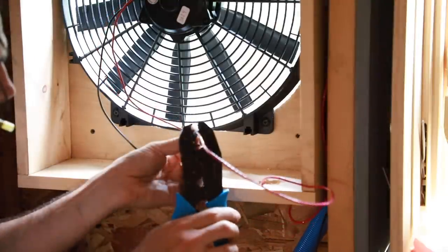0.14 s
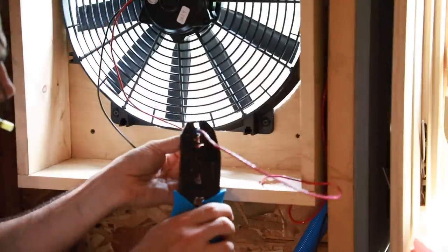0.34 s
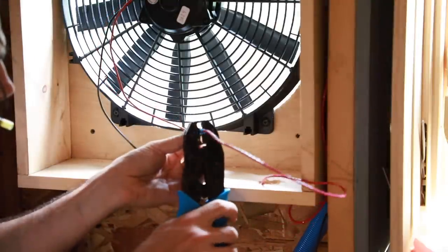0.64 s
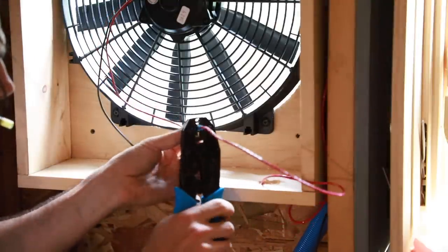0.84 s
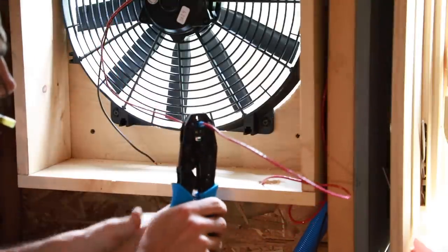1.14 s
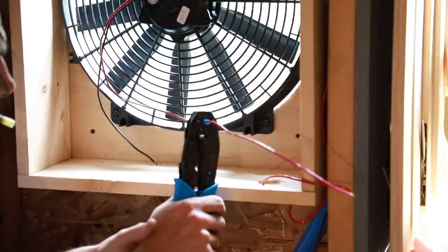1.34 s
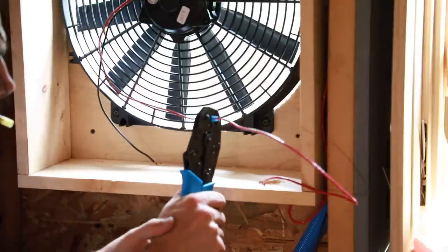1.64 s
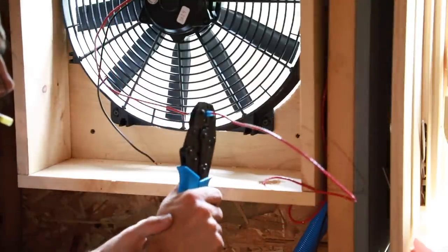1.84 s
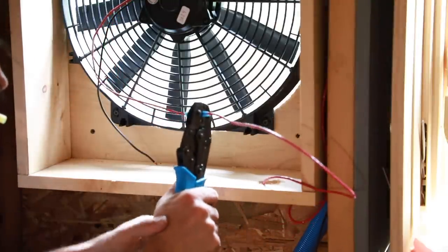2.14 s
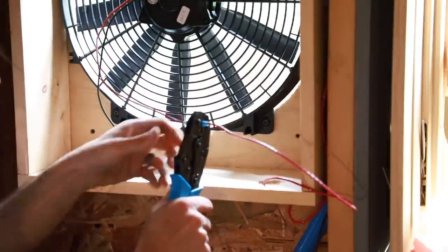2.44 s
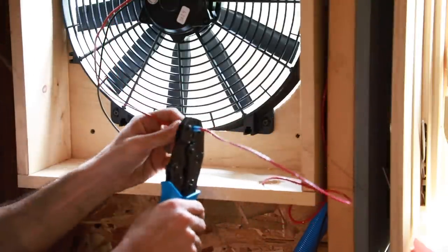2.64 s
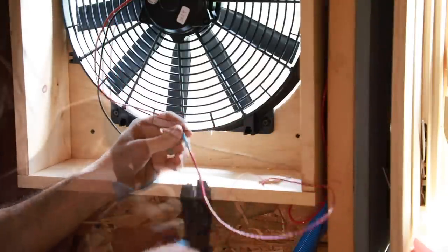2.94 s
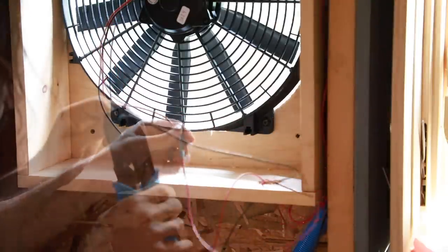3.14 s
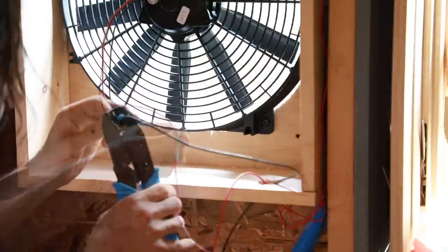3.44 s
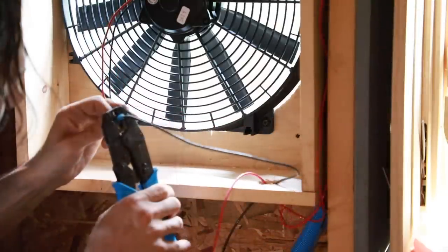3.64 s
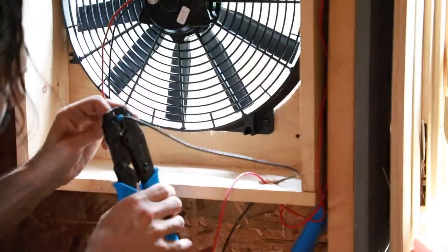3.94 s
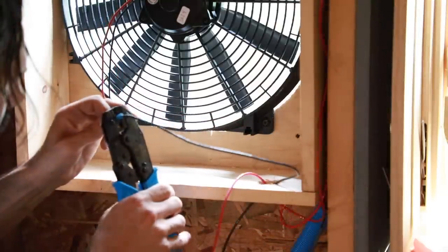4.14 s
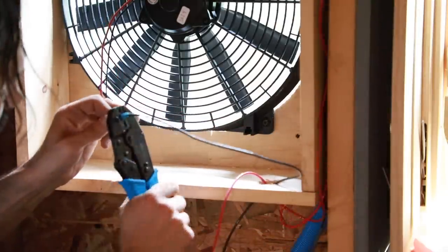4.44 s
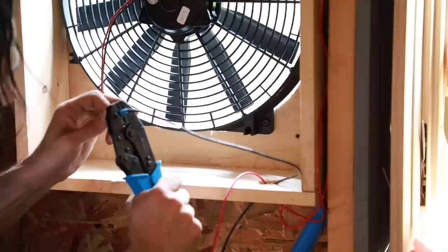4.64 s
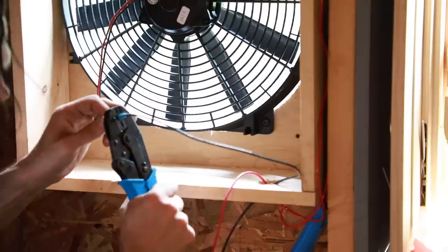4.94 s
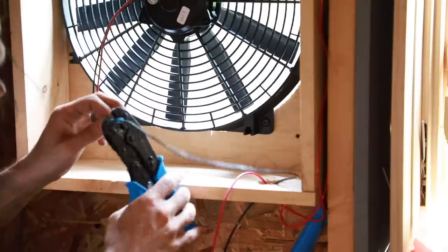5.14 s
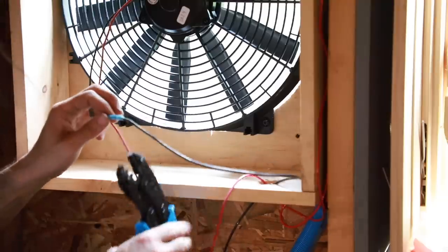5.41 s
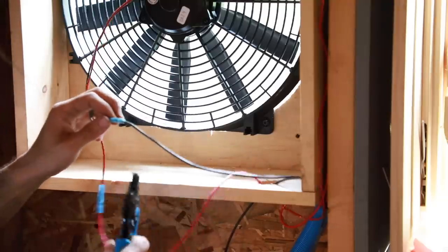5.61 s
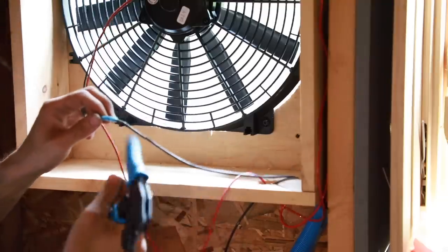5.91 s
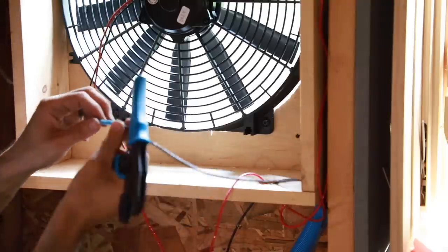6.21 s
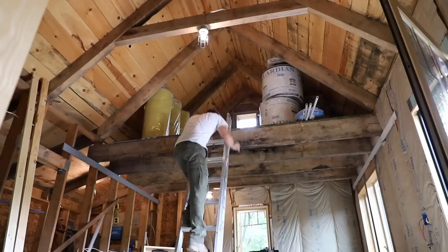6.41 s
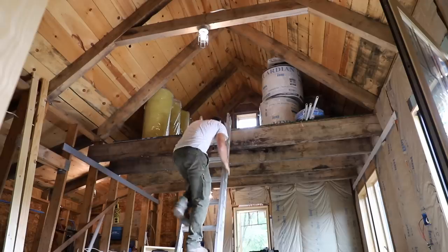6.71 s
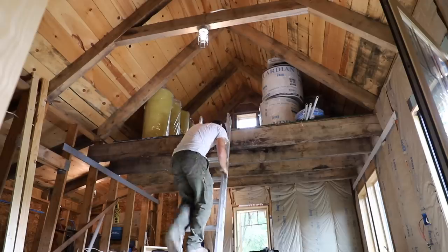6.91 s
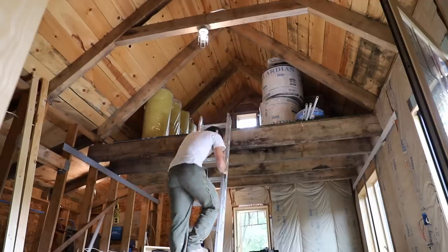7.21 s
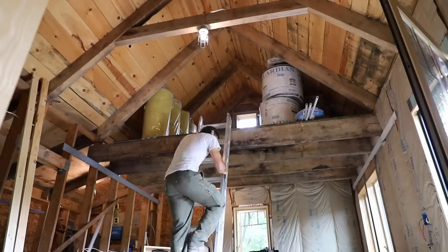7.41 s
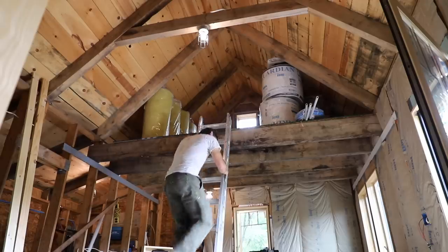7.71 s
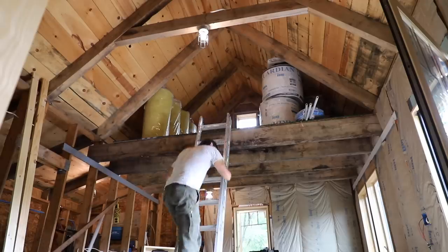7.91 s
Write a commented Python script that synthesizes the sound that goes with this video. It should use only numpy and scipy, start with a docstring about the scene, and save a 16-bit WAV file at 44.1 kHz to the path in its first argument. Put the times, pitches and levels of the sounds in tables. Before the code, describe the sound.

Loud metallic ratchet clicks and small wooden knocks up close, followed by more distant ladder footsteps, booming floor and a brief squeak.

```python
"""Ratchet crimper and ladder in a timber workshop

Close to the microphone a steel crimper clicks tooth by tooth, rasps open and knocks a wooden frame: cracks of
coloured noise with damped modes. Then, from farther away, someone steps down an aluminium ladder: thumps, noise
through rail resonances, swaying beams and a stick-slip squeak. Outdoors are hum, insect noise and two crickets."""
import sys
import numpy as np
from scipy import signal
from scipy.fft import rfft, irfft, next_fast_len
from scipy.io import wavfile
from scipy.ndimage import uniform_filter1d, map_coordinates

SR = 44100
rng = np.random.default_rng(int(sys.argv[2]) if len(sys.argv) > 2 else 0)


def digitize_waveform(pressure):
    """Quantize a signal to 16-bit integers and store it at the path in sys.argv[1].

    Rows of a 2-D input are taken as channels; values are limited to [-1, 1].
    """
    field = np.atleast_2d(pressure).T
    bounded = np.clip(field, -1, 1)
    quanta = np.round(bounded * 32767).astype(np.int16)
    wavfile.write(sys.argv[1], SR, quanta)


def field_ratio(decibels):
    """Amplitude ratio for a level in dB (20 dB per decade); scalars and array-likes work."""
    return 10 ** (np.asarray(decibels, dtype=float) / 20)


N = 355798

# spectrum of a crack of the tool: f/Hz, level/dB
SNAP_SPECTRUM = [(470, -70), (800, -27.5), (942, -10.5), (1190, -21), (1340, -19), (1630, -14),
                 (2470, -8.5), (3020, -3.5), (3690, 0), (5720, -0.5), (8230, -8), (9940, -10), (13600, -18),
                 (16000, -43)]
# sole scuffing on the ladder: f/Hz, level/dB
SCUFF_SPECTRUM = [(410, -36), (700, -7.5), (1590, -6), (4210, -6.5), (5590, -9), (8210, -23),
                  (10500, -27.5), (12500, -33), (15000, -64)]
# loft floor booming: f/Hz, level/dB
RUMBLE_SPECTRUM = [(25, -25), (40, -3), (53, 6), (66, -6), (86, 3), (120, -9.5), (172, -2.5), (210, -10.5),
                   (270, -5), (400, -48.5)]
# room close to the frame: f/Hz, t60/s
BENCH_DECAY = [(500, 0.29), (2000, 0.29), (6000, 0.33), (15000, 0.23)]
# room from farther away: f/Hz, t60/s
HALL_DECAY = [(60, 0.64), (500, 0.84), (3000, 0.46), (12000, 0.25)]


def unit(x):
    """Scales a sound to rms 1."""
    return x / np.sqrt(np.mean(x ** 2) + 1e-20)


def along(points, hz):
    """Reads (Hz, value) points on a log frequency axis."""
    f, v = np.transpose(points)
    return np.interp(np.log(hz + 1), np.log(f + 1), v)


def wobble(rate):
    """A smooth random curve with rate knots a second."""
    knots = rng.standard_normal(int(N * rate / SR) + 4)
    return map_coordinates(knots, [np.arange(N) * rate / SR])


def swell(start, rise_s, hold_s, fade_db_per_s):
    """Gain that rises to 1, holds, then falls at a steady dB rate."""
    t = np.arange(N) / SR - start
    fade_db = -fade_db_per_s * np.clip(t - rise_s - hold_s, 0, None)
    return np.clip(t / rise_s, 0, 1) * field_ratio(fade_db)


def filtered(x, response):
    """Shapes a sound by a response of frequency."""
    m = next_fast_len(len(x) + 8192)  # spare length keeps the tail from wrapping round
    return irfft(rfft(x, m) * response(np.fft.rfftfreq(m, 1 / SR)), m)[:len(x)]


def noise(spectrum, size=N):
    """Coloured noise of rms 1."""
    return unit(filtered(rng.standard_normal(size), lambda hz: field_ratio(along(spectrum, hz))))


def ring(modes, t, near_hz, narrow_db):
    """Damped modes, a little different each time, weaker by narrow_db for each octave from near_hz."""
    total = 0
    for hz, db, t60 in modes:
        start_db = db - narrow_db * abs(np.log2(hz / near_hz)) + 0.49 * rng.standard_normal()
        total = total + field_ratio(start_db - 60 * t / t60) * np.sin(2 * np.pi * hz * t)
    return total


def room(x, decay, wet_db):
    """Adds a fresh diffuse tail in which each frequency dies at its own speed."""
    hz, t, z = signal.stft(rng.standard_normal(SR // 2), SR, nperseg=128)
    fade = field_ratio(-60 * t / along(decay, hz)[:, None])
    tail = signal.istft(z * fade, SR, nperseg=128)[1]
    wet = signal.fftconvolve(x, tail / np.linalg.norm(tail))[:len(x)]
    return x + field_ratio(wet_db) * wet


def add(out, s, sound):
    """Mixes a sound in at time s."""
    part = out[round(s * SR):][:len(sound)]
    part += sound[:len(part)]


def jaws(x):
    """Lifts the broad resonances of the jaws, each a little differently at every contact."""
    # resonances over the plain crack: f/Hz, width/Hz, mean lift/dB
    resonances = [(1390, 310, 7.5), (1870, 150, 7), (2905, 560, 6.5), (3585, 160, 2), (4605, 400, 4.5),
                  (5865, 470, 5), (7450, 390, 3), (9760, 240, 7.5), (10580, 300, 7)]
    lifts = [(c, w, db + 1.3 * rng.standard_normal()) for c, w, db in resonances]

    def response(hz):
        return field_ratio(sum(db / (1 + (2 * (hz - c) / w) ** 2) for c, w, db in lifts))
    return unit(filtered(x, response))


def clicks(events, modes, rings, narrow_db, crack_s, rise_s, wet_db):
    """Each contact is a short coloured crack that also rings the metal."""
    out, t = np.zeros(N), np.arange(SR // 2) / SR
    base_db, octave_db, damping = rings
    for s, db, low_db, high_db, near_hz in events:
        ring_db = base_db + octave_db * np.log2(near_hz / 4000) - damping * low_db
        # the low and high ends of the spectrum are set to the levels of this contact
        low_tilt = low_db - along(SNAP_SPECTRUM, 2630)
        high_tilt = high_db - along(SNAP_SPECTRUM, 9960)
        tilt = [(1900, low_tilt), (2600, 0.01), (7000, 0), (8500, high_tilt)]
        colour = [(hz, level + along(tilt, hz)) for hz, level in SNAP_SPECTRUM]
        crack = jaws(noise(colour, len(t))) * field_ratio(-60 * t / crack_s)
        # the first touch is broad and very brief
        crack += field_ratio(-33 - 60 * t / 0.0049) * np.gradient(rng.standard_normal(len(t)))
        metal = field_ratio(ring_db) * ring(modes, t, near_hz, narrow_db)
        contact = field_ratio(db) * (crack + metal) * (1 - np.exp(-t / rise_s))
        add(out, s, room(contact, BENCH_DECAY, wet_db))
    return out


def ratchet_teeth():
    """Ratchet teeth and snapping jaws crack sharply and ring the steel near the mode struck most."""
    # contacts: t/s, level/dB, low body/dB, treble/dB, mode struck most f/Hz
    contacts = [(.3156, -3.5, -9.5, -4.5, 1140), (.4238, -3, -17, -1.5, 2970), (.9899, -10, -11, -7, 3605),
                (1.4363, -3.5, -5, -3, 1140), (1.5056, -3, -5.5, -4, 4310), (1.5417, -5.5, 0.5, 3, 4310),
                (1.5869, -4.5, -6, 0, 5600), (1.6333, -2.5, 0, -5.5, 4200), (2.761, -24, -20, 8, 10550),
                (2.8201, -17, 3, -10, 2800), (4.2944, -6.5, -16, -6, 1140), (4.376, -0.5, -18, 1.5, 1140),
                (4.4185, -3.5, -6.5, 1, 10550), (4.4536, -6.5, -20, 2.5, 9600), (4.4835, -6, -6, 0.5, 9900),
                (4.5159, -3.5, -4.5, -2, 1140), (5.1622, -16, -10, -4.5, 2890),
                (5.2375, -9, -4, -6.5, 2890), (5.9863, -22.5, -3, -13, 4300),
                (6.0753, -30.5, -1, -20, 4310)]
    # steel of the tool: f/Hz, level/dB, t60/s
    steel = [(1140, -4, .45), (2890, 0, .55), (3605, 2, .6), (4310, -8, .8), (5000, -4, .12),
             (5870, 0, .14), (8370, -8, .4), (9680, 0, .12), (10550, -3, .2)]
    # ringing: level at 4 kHz/dB, rise per octave of the struck mode/dB, loss per dB of low body/dB
    rings = (-34, 5, .05)
    return clicks(contacts, steel, rings, narrow_db=32.0, crack_s=0.033, rise_s=.0001, wet_db=-3.0)


def pawl_ticks():
    """The loose pawl ticks lightly, with a softer onset and almost all its modes sounding."""
    # contacts: t/s, level/dB, low body/dB, treble/dB, mode struck most f/Hz
    contacts = [(.0846, -27.5, -38, -16, 3660), (.2533, -23.5, -7.5, -7.5, 5150),
                (2.586, -29.5, -0.5, -10.5, 3300), (2.6844, -27, -33, -12, 4370),
                (3.3538, -41, 2, -24, 3300), (3.6346, -41.5, 5, -12, 4470), (4.9798, -32.5, 6, -6, 3560),
                (4.991, -36, -14, -17, 3880), (5.053, -37.5, -25, -4, 4490), (5.1064, -29, -40, -6, 4140),
                (5.452, -30.5, 5.5, -46, 3370), (5.5487, -39.5, -21, -4, 5460), (5.6634, -38, 5, -5, 5790),
                (5.683, -41, -21, -9, 3710), (5.7586, -25, -7, -18.5, 4290)]
    # the pawl: f/Hz, level/dB, t60/s
    pawl = [(3025, -1, .15), (4050, 0, .13), (5170, -2, .12), (6850, -5, .1), (10400, -9, .05)]
    # ringing: level at 4 kHz/dB, rise per octave of the struck mode/dB, loss per dB of low body/dB
    rings = (-24, .1, .38)
    return clicks(contacts, pawl, rings, narrow_db=1, crack_s=0.047, rise_s=0.001, wet_db=-3.5)


def skids():
    """The pawl skids over the teeth as the jaws spring open: fast contacts blur into a swelling rasp."""
    # skids: start t/s, end t/s, level/dB, typical teeth per second/Hz
    runs = [(2.753, 2.843, -20.5, 450), (5.155, 5.238, -22, 400)]
    out, t = np.zeros(N), np.arange(SR // 2) / SR
    for start, end, db, rate in runs:
        teeth_passed = np.cumsum(rate / SR * field_ratio(2.5 * wobble(300)[:len(t)]))
        hits = np.diff(np.floor(teeth_passed), prepend=0)
        hits = hits * field_ratio(1.8 * rng.standard_normal(len(t))) * (t < end - start)
        decay = field_ratio(-60 * t[:SR // 20] / 0.017)
        gate = signal.fftconvolve(hits * (1 - np.exp(-t / 0.018)), decay)[:len(t)]
        rasp = field_ratio(db) * gate * jaws(noise(SNAP_SPECTRUM, len(t)))
        add(out, start, room(rasp, BENCH_DECAY, wet_db=-7.0))
    return out


def knocks():
    """Handle and wire bounce on the wooden frame, ringing most its modes near the brightest part."""
    # knocks: t/s, level/dB, brightest part f/Hz
    blows = [(0.774, -41, 447), (1.048, -36.5, 640), (1.368, -41, 666), (1.655, -27.5, 955),
             (2.166, -36, 1640), (2.903, -31.5, 684), (5.467, -28.5, 267), (5.522, -35.5, 513),
             (5.776, -14.5, 880), (5.843, -29, 600), (5.872, -32, 625), (5.956, -35, 450),
             (5.991, -34, 640)]
    # the frame before the hand damps it: f/Hz, level/dB, t60/s
    wood = [(267, 0, .08), (450, -3, .06), (647, 0, .07), (770, -4, .05), (1053, 0, .05), (1390, -5, .04),
            (1640, -1, .05), (2180, -6, .04)]
    out, t = np.zeros(N), np.arange(SR // 2) / SR
    bouncing = t[:SR // 20]
    for s, db, hz in blows:
        bounce = rng.standard_normal(len(bouncing)) * field_ratio(-60 * bouncing / 0.071)
        bounce *= 1 - np.exp(-bouncing / 0.0062)
        damped = ring(wood, t, hz, narrow_db=11.5) * field_ratio(-60 * t / 0.038)  # the gripping hand damps the wood
        blow = signal.fftconvolve(damped, bounce)[:len(t)]
        # the knocks carry little deep bass
        blow = filtered(blow, lambda f: (1j * f / (220 + 1j * f)) ** 2)
        add(out, s, room(field_ratio(db) * blow / np.abs(blow).max(), BENCH_DECAY, wet_db=-8.5))
    return out


def rails(hz, near_hz=600, narrow_db=0):
    """Response of the hollow aluminium rails, weaker by narrow_db for each octave from near_hz."""
    # resonances: f/Hz, width/Hz, level/dB
    resonances = [(491.6, 74, 1), (546, 9.1, -3), (592, 14.6, -5), (675, 105, -4), (954, 65, -5),
                  (1374, 51, -4.5), (1650, 53, -6), (2000, 250, -11.5), (2480, 690, -16.5), (4130, 72, -17)]
    total = 0
    for k, (c, w, db) in enumerate(resonances):
        gain = (-1) ** k * field_ratio(db - narrow_db * abs(np.log2(c / near_hz)))
        total = total + gain * 1j * hz * w / (c * c - hz * hz + 1j * hz * w)
    return total


def steps():
    """A foot lands on a rung: the floor thumps, the rails ring, the sole slaps."""
    # landings: t/s, relative level/dB, thump/dB, slap/dB, rail mode struck most f/Hz
    landings = [(6.45, -11, -2.5, -1.5, 510), (6.607, -14.5, -22, -0.5, 490), (6.639, -10, -29, -1, 650),
                (6.743, -15.5, 2, 0, 630), (6.873, -12, -23, -5, 670), (7.02, -25.5, 7, -13, 533),
                (7.237, -15.5, -6, 3.5, 500), (7.254, -6.5, -30, -3.5, 590), (7.323, -12, 5.5, 8.5, 665),
                (7.634, -37.5, 7.5, 15.5, 686), (7.655, -45, 2, -8, 681), (7.835, -40.5, -15, 19.5, 458),
                (7.924, -24.5, -4, 6.5, 500), (7.954, -12, -29, -3, 490), (8.009, -14, -2, -11, 514)]
    out, t = np.zeros(N), np.arange(SR * 2 // 3) / SR
    rise = 1 - np.exp(-t / .0015)
    for s, db, thump_db, slap_db, near_hz in landings:
        thump = noise(RUMBLE_SPECTRUM, len(t)) * field_ratio(thump_db - 60 * t / 0.23) * rise
        strike = rng.standard_normal(len(t)) * field_ratio(-60 * t / .05)
        clang = filtered(strike, lambda hz: rails(hz, near_hz, narrow_db=9))
        slap = filtered(noise(SCUFF_SPECTRUM, len(t)), lambda hz: 0.3 + np.abs(rails(hz)) * hz / 900)
        slap = unit(slap) * field_ratio(slap_db - 60 * t / 0.047) * rise
        ringing = room(clang / np.abs(clang).max() + slap, HALL_DECAY, wet_db=3.5)
        add(out, s, field_ratio(db - 9.5) * (thump + ringing))
    return out


def ladder():
    """Each weight shift rattles the rails with gritty contacts, scuffs the soles, booms and sways the loft."""
    # weight shifts: start t/s, hold/s, loft-floor rumble/dB, rail rattle/dB, shoe scuff/dB
    shifts = [(6.444, 0.053, -28.5, -46, -33), (6.615, 0.11, -31.5, -26.5, -40.5),
              (6.732, 0.032, -27.5, -30.5, -35), (6.862, 0.05, -41, -32.5, -49),
              (7.025, 0.056, -40.5, -40.5, -52), (7.239, 0.12, -26, -28.5, -26),
              (7.41, 0.02, -49, -49, -52), (7.602, 0.024, -53, -47, -39), (7.846, .07, -55, -48, -43),
              (7.93, 0.055, -32.5, -36.5, -35.5)]
    # fades after the hold: rumble/dB per s, rattle/dB per s, scuff/dB per s
    fades = (100, 144, 113)
    # two beating swings of the loft beams: f/Hz, level over the rumble that drives them/dB
    swings = [(27, -10.5), (37, -6.5)]
    rise_s, sway_memory_s = 0.013, 0.13
    t = np.arange(N) / SR

    def envelope(column, fade):
        powers = ((field_ratio(row[column]) * swell(row[0], rise_s, row[1], fade)) ** 2 for row in shifts)
        return np.sqrt(sum(powers))
    rumble_gain, rattle_gain, scuff_gain = [envelope(2 + k, fade) for k, fade in enumerate(fades)]
    grit = field_ratio(1.4 * wobble(160))
    rattle = unit(filtered(grit * rng.standard_normal(N), rails)) * rattle_gain
    scuff = unit(grit * noise(SCUFF_SPECTRUM)) * scuff_gain
    rumble = noise(RUMBLE_SPECTRUM) * rumble_gain
    # the beams keep swaying as the memory of the rumble fades
    memory = np.exp(-t[:2 * SR] / sway_memory_s)
    drive = np.sqrt(np.abs(signal.fftconvolve(rumble_gain ** 2, memory / memory.sum())[:N]))
    sway = drive * sum(field_ratio(db) * np.sin(2 * np.pi * (hz * t + rng.random())) for hz, db in swings)
    return rattle + scuff + rumble + sway


def squeak():
    """A rail rubs the beam: stick-slip at an unsteady, slightly climbing rate gives a rough overtone stack."""
    # rubs: start t/s, hold/s, slips per second mid-hold f/Hz, level/dB, octave level/dB
    rubs = [(6.635, .075, 640, -28.5, -26), (6.758, 0.025, 652, -20.5, -47)]
    # odd overtones: multiple of the slip rate, level/dB
    orders = [(1, 2.5), (3, -10), (5, -12.5)]
    rise_s, fade_db_per_s, climb_hz_per_s = 0.0046, 700, 360
    out, t = np.zeros(N), np.arange(N) / SR
    for start, hold_s, hz, db, octave_db in rubs:
        slips = hz + climb_hz_per_s * (t - start - hold_s / 2)
        phase = 2 * np.pi * np.cumsum(slips * (1 + .016 * wobble(250))) / SR
        odd = sum(field_ratio(db + level + 3 * wobble(120)) * np.sin(k * phase) for k, level in orders)
        octave = field_ratio(octave_db + 3 * wobble(120)) * np.sin(2 * phase)
        out += (odd + octave) * swell(start, rise_s, hold_s, fade_db_per_s)
    return room(out, HALL_DECAY, wet_db=-13.0)


def crickets():
    """One trills with nearly steady wing strokes; another gives a single short chirp."""
    # trills of the near cricket: start t/s, swell/s, fade from t/s, f/Hz, level before strokes/dB
    trills = [(-.5, .5, 2.4, 8110, -62), (2.9, .6, 4.97, 8040, -63), (5.88, .07, 7.8, 7800, -62)]
    # one chirp of the second cricket: start t/s, latest end t/s, gate rate/Hz, f/Hz, level/dB
    first, last, rate, chirp_hz, chirp_db = (3.22, 3.5, 3, 7207.5, -64.5)
    t = np.arange(N) / SR
    strokes = 1 + .6 * np.sin(2 * np.pi * np.cumsum(28 * (1 + .05 * wobble(4))) / SR)
    waver = 2 * np.pi * np.cumsum(70 * wobble(400)) / SR
    trill = 0
    for start, rise_s, end, hz, db in trills:
        gain = field_ratio(db) * swell(start, rise_s, end - start - rise_s, fade_db_per_s=250)
        trill = trill + gain * np.sin(2 * np.pi * hz * t + waver)
    # the gate opens for 0.3 of its cycle, and only one opening fits before the latest end
    gate = ((t - first) * rate % 1 < .3) * (t > first) * (t < last)
    chirp_phase = 2 * np.pi * np.cumsum(chirp_hz + 60 * wobble(300)) / SR
    chirp = uniform_filter1d(gate * 1., size=300) * np.sin(chirp_phase)
    return trill * strokes * field_ratio(1.5 * wobble(13)) + field_ratio(chirp_db) * chirp


def air():
    """Outdoor hum and a broad, distant insect chorus, both filtered noise of wavering level."""
    # chorus swelling and sinking: t/s, level/dB
    chorus_s, chorus_db = np.transpose([(0, -52), (2.9, -52.5), (3.4, -65.5), (4.3, -61), (5.3, -52.5),
                                        (6.42, -53), (6.46, -58), (8.07, -54)])
    # hum: f/Hz, level/dB
    hum_spectrum = [(12, -39), (20, -0.5), (146, 2.5), (2140, -18), (4810, -19), (5680, -14.5),
                    (6910, -22.5), (7950, -13.5), (8650, -22.5), (14700, -26), (16000, -133)]
    # insects: f/Hz, level/dB
    chorus_spectrum = [(2500, -9), (4000, -4.5), (5600, 1), (6800, -4), (9000, -20.5)]
    t = np.arange(N) / SR
    # the hum turns fuller and duller from 6.44 s on
    dull_from_s, dull_hz = 6.44, 5040
    dull_hum = field_ratio(-45) * filtered(noise(hum_spectrum), lambda hz: 1 / (1 + 1j * hz / dull_hz))
    bright_hum = field_ratio(-49.5) * noise(hum_spectrum)
    hum = np.where(t < dull_from_s, bright_hum, dull_hum) * field_ratio(.7 * wobble(3))
    return hum + noise(chorus_spectrum) * field_ratio(np.interp(t, chorus_s, chorus_db) + 1.0 * wobble(22))


def scene():
    """Tool, ladder and air at one microphone."""
    tool = ratchet_teeth() + pawl_ticks() + skids() + knocks()
    descent = steps() + ladder() + squeak()
    return (tool + descent + crickets() + air())[None]


def roll_off(x):
    """The treble ends steeply here."""
    return signal.sosfilt(signal.butter(12, 16520, fs=SR, output="sos"), x)


def record(dry):
    """Gain control follows recent loudness, so the background ducks in a run of clicks; peaks clip."""
    memory = np.exp(-np.arange(SR // 2) / (.07 * SR))  # 70 ms
    loudness = signal.fftconvolve(dry[0] ** 2, memory / memory.sum())[:N]
    gain = (1 + np.abs(loudness) / field_ratio(-20.0) ** 2) ** -.3
    mix = np.clip(dry * gain, -1, 1)
    return roll_off(mix)


dry = scene()
out = record(dry)
digitize_waveform(out)
```